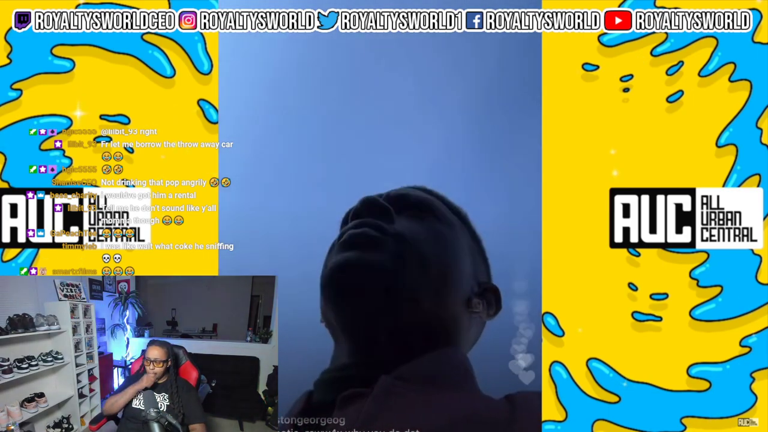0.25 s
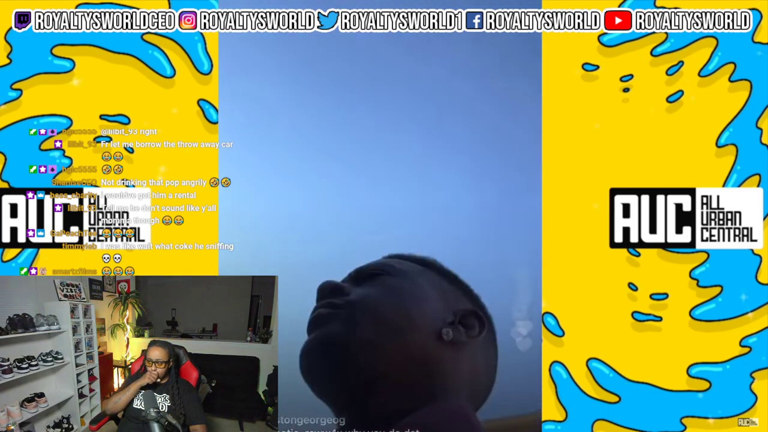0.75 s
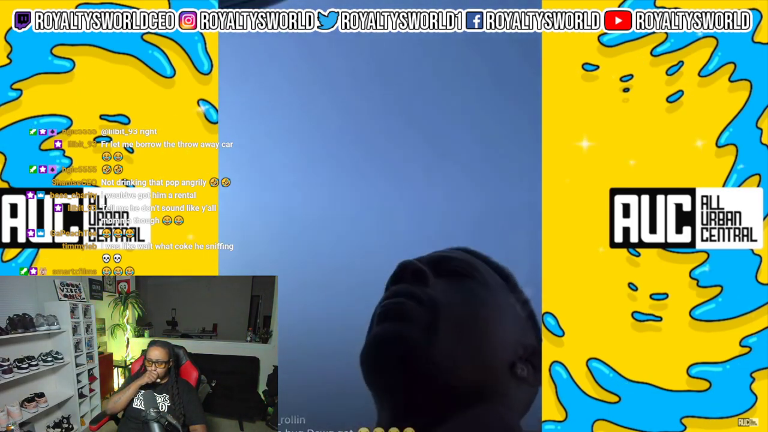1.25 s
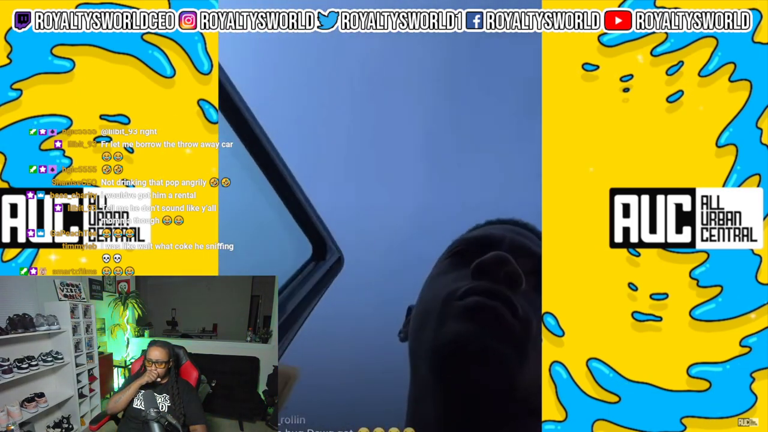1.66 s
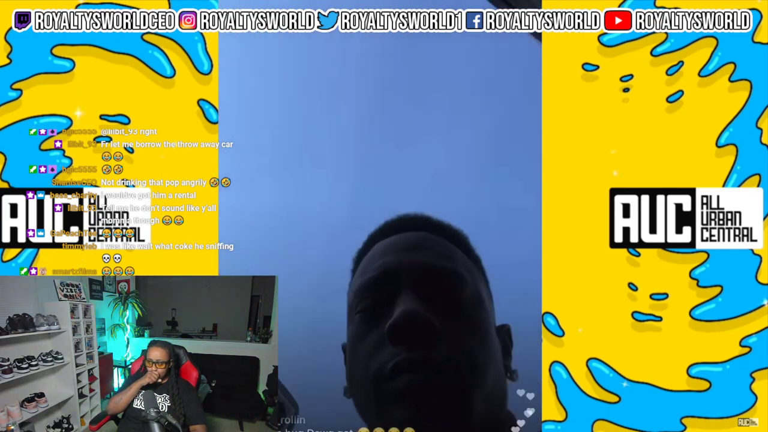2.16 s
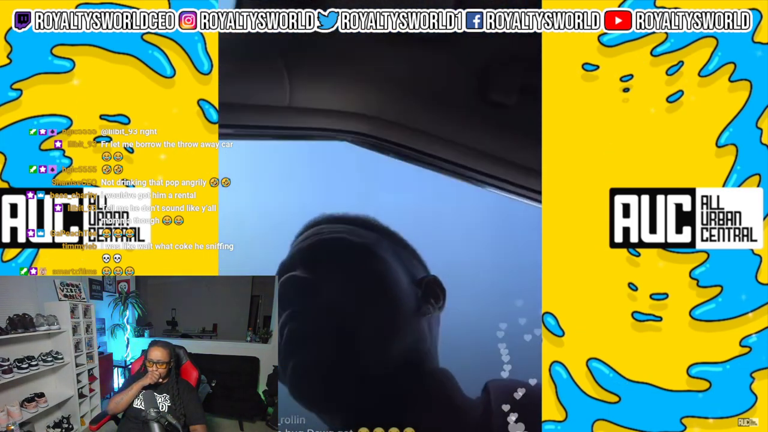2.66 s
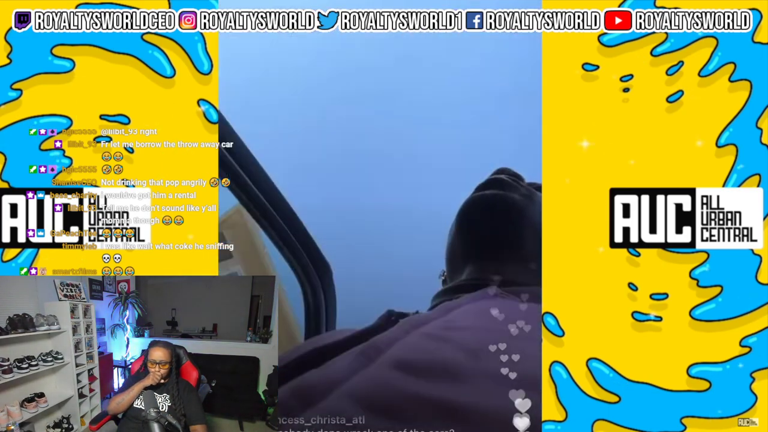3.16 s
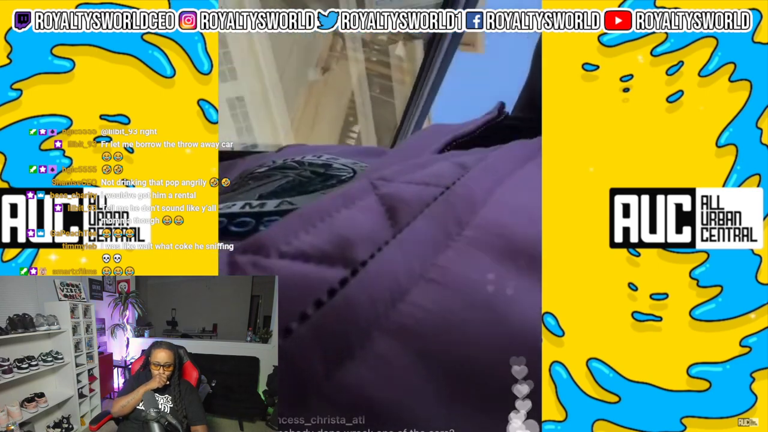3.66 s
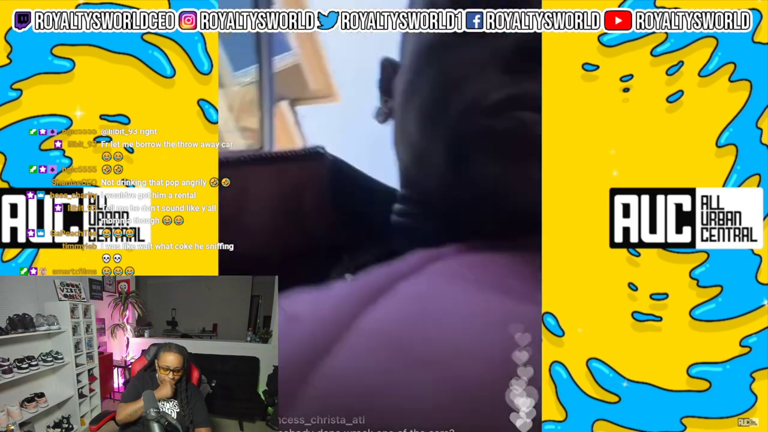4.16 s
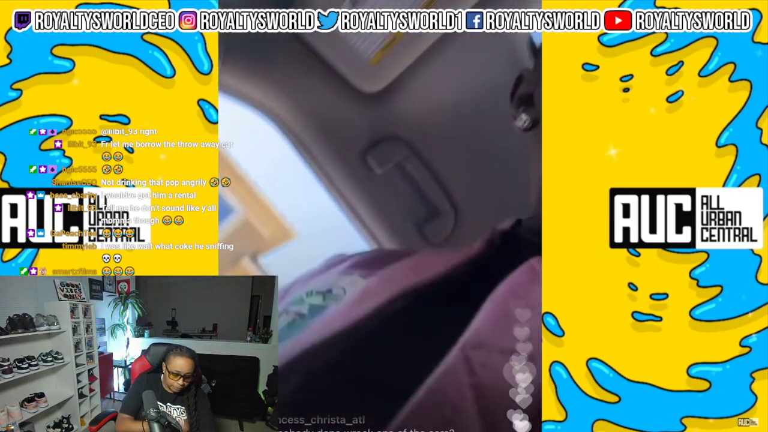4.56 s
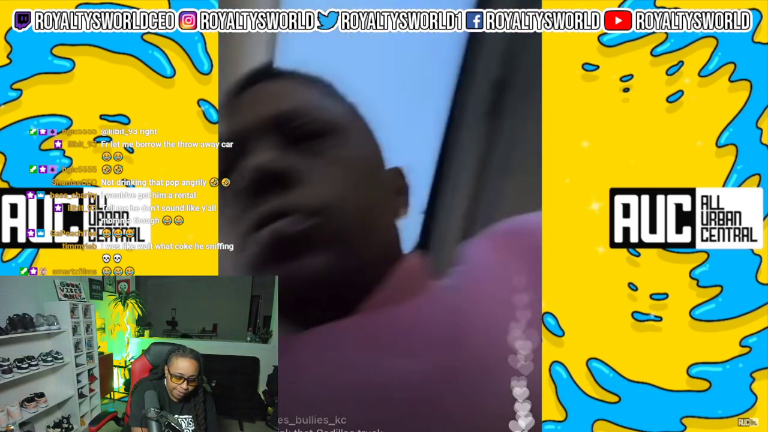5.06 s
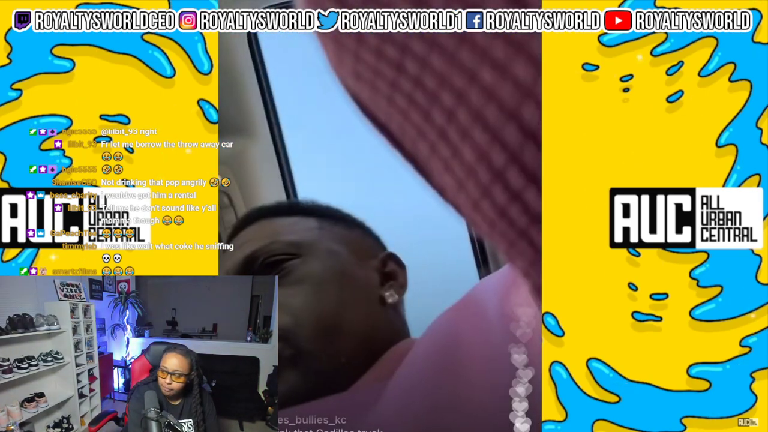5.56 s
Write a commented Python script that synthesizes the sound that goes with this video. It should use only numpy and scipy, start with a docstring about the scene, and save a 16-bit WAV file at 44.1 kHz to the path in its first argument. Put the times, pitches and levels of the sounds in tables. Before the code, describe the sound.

Handling bumps and a short rubbing groan, a ringing metal latch and door shudder, quilted cloth rustling, a deep body boom, and two final knocks.

```python
"""A car door opens and someone holding a phone slides in: a ringing latch, then a clunk and shudder.
Random rattles through shaped resonances make the latch, knocks and clicks; low swings make the
thumps and the boom of the car body under the weight. Coloured slip noise makes the fingers rubbing
the phone, the scuffs and the swish of a quilted jacket, over faint outdoor air noise.
Two last knocks end the move."""
import sys
import numpy as np
from scipy import signal
from scipy.fft import rfft, irfft
from scipy.io import wavfile
from scipy.ndimage import uniform_filter1d

SR = 44100
rng = np.random.default_rng(int(sys.argv[2]) if len(sys.argv) > 2 else 0)


def generate_wav(signal):
    """Clip the signal to [-1, 1] and save it as 16-bit WAV at the path in sys.argv[1]."""
    frames = np.transpose(np.atleast_2d(signal))
    scaled = np.clip(frames, -1, 1) * 32767
    pcm = np.round(scaled).astype(np.int16)
    wavfile.write(sys.argv[1], SR, pcm)


N = 256662
TIME = np.arange(N) / SR
EDGE_HZ = 15900  # upper edge of the phone's band


def amp(db):
    """Turns dB into a linear gain."""
    return 10 ** (np.asarray(db) / 20)


def unit(x):
    """Scales to rms 1."""
    return x / np.sqrt(np.mean(x ** 2) + 1e-20)


def read(points, hz):
    """Reads a frequency table on a log-frequency axis."""
    f, value = np.transpose(points)
    return np.interp(np.log(hz + 1), np.log(f + 1), value)


def level(rows, axis=1):
    """Gain over time from one dB column of a curve."""
    rows = np.array(rows)
    return amp(np.interp(TIME, rows[:, 0], rows[:, axis]))


def add(mix, s, sound):
    """Mixes a sound in at time s, in place."""
    part = mix[max(round(s * SR), 0):][:len(sound)]
    part += sound[:len(part)]


def colour(x, points):
    """Filters x by a dB curve, then scales it to rms 1."""
    gain = amp(read(points, np.fft.rfftfreq(len(x), 1 / SR)))
    return unit(irfft(rfft(x) * gain, len(x)))


def hump(hz, centre_hz, octaves, skirt_db):
    """One broad resonance, in dB."""
    distance = np.log2((hz + 1) / centre_hz) / octaves
    return -skirt_db * np.log1p(distance ** 2)


def waver(hz):
    """Random drift of rms 1, falling away above hz."""
    rolloff = 1 + (np.fft.rfftfreq(N, 1 / SR) / hz) ** 4
    return unit(irfft(rfft(rng.standard_normal(N)) / rolloff, N))


def friction(per_s, spread_db, smooth):
    """Tiny slips of uneven size over a smooth drag, rms 1."""
    happens = rng.random(N) < per_s / SR
    size = rng.standard_normal(N) * amp(spread_db * np.minimum(rng.exponential(1, N), 4))
    return unit(unit(happens * size) + smooth * rng.standard_normal(N))


def impulse(curve_db, lag_cycles=1.597, corner_hz=35, size=8192):
    """Causal tap response of energy 1; the highs come first and the bass lags, a quick downward chirp."""
    hz = np.fft.fftfreq(size, 1 / SR)
    log_gain = np.log(amp(np.maximum(curve_db(abs(hz)), -100)))
    minimum_phase = np.exp(np.conj(signal.hilbert(log_gain)))
    lag = 2 * np.pi * lag_cycles * np.sign(hz) * np.log1p(abs(hz) / corner_hz)
    h = np.fft.ifft(minimum_phase * np.exp(-1j * lag)).real[:size // 2]
    return h / np.linalg.norm(h)


def rattle(ring, size=16384):
    """Dense random echoes; each band falls 60 dB in ring(hz) seconds, 4 ms at least."""
    hz, t, z = signal.stft(rng.choice([-1., 1.], size), SR, nperseg=128)
    decay_db = -60 * t / np.maximum(ring(hz), .004)[:, None]
    return signal.istft(z * amp(decay_db), SR, nperseg=128)[1]


def blow(ring, chatter_db):
    """A clean tap followed by random chatter, energy 1."""
    drive = rattle(ring)
    drive *= amp(chatter_db) / np.linalg.norm(drive)
    drive[0] += 1
    return drive / np.linalg.norm(drive)


def ringing(modes, size=16384):
    """Free vibration of a struck part: decaying sines, peak 1."""
    t = np.arange(size) / SR
    x = sum(amp(db - 60 * t / t60) * np.sin(2 * np.pi * hz * t) for hz, db, t60 in modes)
    return x / abs(x).max()


# open air around the car: (time [s], wash level [dB], hiss level [dB]), before the layer gains
AIR_LEVEL = [(0.0, -59, -62), (0.32, -57, -70), (0.69, -62, -63.5), (1.08, -61, -68), (1.35, -54, -63.5),
             (1.78, -55.5, -66.5), (2.0, -65.5, -73), (2.41, -68, -64.5), (3.1, -59.5, -63)]
# spectrum of the low wash: (frequency [Hz], level [dB])
WASH_COLOUR = [(20, -1), (45, -0.5), (92, -8), (280, -17), (520, -20), (1000, -20.5), (1600, -25.5),
               (2400, -26), (5000, -34.5), (9000, -77)]
# spectrum of the thin hiss: (frequency [Hz], level [dB])
HISS_COLOUR = [(1200, -7), (2000, -10), (3200, -6), (7800, -5), (10500, -15.5), (16000, -12)]


def air(wash_db=5, hiss_db=1, drift_db=2):
    """Faint outdoor noise: a low wash that drifts in level, with a thin hiss on top."""
    wash = colour(rng.standard_normal(N), WASH_COLOUR) * level(AIR_LEVEL, axis=1)
    wash *= amp(wash_db + drift_db * waver(hz=9.3))
    hiss = colour(rng.standard_normal(N), HISS_COLOUR) * level(AIR_LEVEL, axis=2)
    return wash + hiss * amp(hiss_db)


# scuffs of sleeve, shoe and seat, level before the swell:
# (time [s], level [dB], length [s], centre [Hz], width [octaves])
SCUFFS = [(0.15, -58, 0.22, 4930, 1.7), (0.269, -38.5, 0.17, 1940, 1.5), (0.718, -55, 0.071, 3400, 1.8),
          (0.741, -45.5, 0.05, 330, 0.51), (0.811, -50, 0.23, 220, 1.46), (1.101, -53.5, 0.14, 6000, 5.4),
          (1.934, -44, 0.062, 840, 2.37), (2.32, -67, 0.3, 13000, 1), (5.01, -53.5, 0.43, 1340, 0.43),
          (5.368, -45, 0.24, 1510, 0.98)]


def scuffs(skirt_db=16.0, top_hz=9500):
    """Brief swells of cloth friction, each in its own broad resonance."""
    out, drag = np.zeros(N), friction(per_s=2000, spread_db=2.5, smooth=.8)
    hz = np.geomspace(20, EDGE_HZ, 80)
    dull_top = 10 / (1 + (top_hz / hz) ** 20)  # takes up to 10 dB off above top_hz
    for s, db, length, centre_hz, octaves in SCUFFS:
        stroke = drag[round(s * SR):][:round(length * SR)]
        shape = hump(hz, centre_hz, octaves, skirt_db) - dull_top
        swell = np.sqrt(np.hanning(len(stroke)))
        add(out, s, amp(db) * colour(stroke, np.column_stack([hz, shape])) * swell)
    return out


SAG_DB_PER_S, STOP_DB_PER_S = 29, 213  # a stroke slows while it lasts, then falls faster still


def stroke_gain(s, rise, length):
    """One slide of cloth: it gathers speed, sags and stops."""
    t = np.maximum(TIME - s, 0)
    speed = np.sin(np.pi / 2 * np.minimum(t / rise, 1))
    sag_db = SAG_DB_PER_S * np.maximum(t - rise, 0)
    stop_db = STOP_DB_PER_S * np.maximum(t - length, 0)
    return speed * amp(-sag_db - stop_db)


# strokes of the jacket, one per shift of the body, levels before the layer gains:
# (time [s], rise of the shell [s], length [s], swish level [dB], padding level [dB])
JACKET = [(2.813, 0.032, 0.3, -56, -69), (3.163, .055, 0.078, -42.5, -43.5), (3.24, 0.037, 0.14, -55, -47),
          (3.389, 0.16, 0.21, -46.5, -41), (3.58, 0.25, 0.76, -50.5, -52),
          (3.917, 0.12, 0.16, -34.5, -32.5), (4.067, .04, 0.34, -39.5, -34),
          (4.224, 0.052, 0.18, -36, -43.5), (5.38, 0.019, 0.11, -43, -68)]
# the back sliding down into the seat: (time [s], swish level [dB], padding level [dB]), before the gains
SETTLING = [(4.45, -58, -46), (4.84, -60.5, -47.5), (4.91, -52, -41), (5.15, -53.5, -45.5),
            (5.35, -49, -43), (5.57, -51, -47), (5.66, -75, -55.5), (5.82, -76, -52)]
# spectrum of the woven shell: (frequency [Hz], level [dB])
SWISH_COLOUR = [(500, -1), (900, -2), (1800, -5.5), (2800, -5), (4500, -6.5), (7000, -6), (8500, -7.5),
                (10500, -20), (15500, -16.5)]
# spectrum of the rubbing padding: (frequency [Hz], level [dB])
PADDING_COLOUR = [(25, -30), (60, 3.5), (110, 3), (230, 1.5), (400, -2), (600, -5), (1200, -12.5),
                  (2500, -23.5), (5000, -33)]
PADDING_RISE_SHARE = 0.38  # the padding catches sooner than the shell gets up to speed


def jacket(swish_db=0, padding_db=-2.5, flutter_db=0.33, lumps_db=1, fade_s=0.062):
    """The woven shell hisses as it slides; the padding under it rubs in soft, uneven lumps."""
    flutter = waver(hz=45)
    weave = friction(per_s=2500, spread_db=2.2, smooth=1.8)
    lumps = friction(per_s=600, spread_db=1.8, smooth=1.2)
    # the settling fades in just ahead of its first point
    seated = np.clip((TIME - SETTLING[0][0]) / fade_s + 1, 0, 1)
    slide = seated * level(SETTLING, axis=1)
    press = seated * level(SETTLING, axis=2)
    for s, rise, length, slide_db, press_db in JACKET:
        slide = np.hypot(slide, amp(slide_db) * stroke_gain(s, rise, length))
        press = np.hypot(press, amp(press_db) * stroke_gain(s, rise * PADDING_RISE_SHARE, length))
    swish = colour(weave, SWISH_COLOUR) * slide * amp(swish_db + flutter_db * flutter)
    padding = colour(lumps, PADDING_COLOUR) * press * amp(padding_db + lumps_db * flutter)
    return swish + padding


# fingers dragging over the phone case, level before the layer gain:
# (time of firmest pressure [s], level [dB], easing off [dB/s])
GRIPS = [(0.328, -22.5, 177), (0.766, -42, 448), (1.166, -28.5, 96)]
# spectrum of skin on the case: (frequency [Hz], level [dB])
GRIP_COLOUR = [(25, -10), (60, 4), (400, 4), (950, -5.5), (1200, -10), (1900, -15), (3600, -19),
               (5600, -31.5), (8000, -26.5), (13000, -79)]
GRIP_RISE_DB_PER_S = 345


def grip(gain_db=-3):
    """Skin sticks and slips on the case as the finger pressure rises and eases."""
    rub = colour(friction(per_s=830, spread_db=-5, smooth=0.99), GRIP_COLOUR)
    pressure = np.zeros(N)
    for s, db, easing in GRIPS:
        drop_db = np.maximum(GRIP_RISE_DB_PER_S * (s - TIME), easing * (TIME - s))
        pressure += amp(db - drop_db)
    return amp(gain_db) * pressure * rub


def patchy(x, patch_db=2.4, span_s=0.033, span_hz=260):
    """Random patches of gain over time and frequency make the colour of the rubbing shift unevenly."""
    hz, t, z = signal.stft(x, SR, nperseg=512, noverlap=384)
    # random gains smoothed over time, then over frequency
    patches = uniform_filter1d(rng.standard_normal(z.shape), max(round(span_s / t[1]), 1), axis=1)
    patches = unit(uniform_filter1d(patches, max(round(span_hz / hz[1]), 1), axis=0))
    shifted = signal.istft(z * amp(patch_db * patches), SR, nperseg=512, noverlap=384)[1][:N]
    return unit(shifted) * np.std(x)


# a fingertip judders on the case, loudest in mid-slip, with its rate rising through the slip
JUDDER_S, JUDDER_DB, JUDDER_SWELL_S = 0.370, -19, 0.013
JUDDER_HZ, JUDDER_RISE_HZ_PER_S = 330, 3500  # rate in mid-slip and its climb


def judder(jitter=0.07, overtone_db=-13):
    """Stick and slip fall briefly into step: a rough, rising groan of skin on plastic."""
    t = TIME - JUDDER_S
    rate = np.clip(JUDDER_HZ + JUDDER_RISE_HZ_PER_S * t, JUDDER_HZ / 2, JUDDER_HZ * 2)
    turns = np.cumsum(rate * (1 + jitter * waver(hz=150))) / SR
    # overtone_db is the slope per octave
    groan = sum(amp(overtone_db * np.log2(k)) * np.sin(2 * np.pi * k * turns) for k in range(1, 5))
    return unit(groan) * amp(JUDDER_DB) * np.exp(-abs(t) / JUDDER_SWELL_S)


# knocks on the phone case and door trim, level before the layer gain:
# (time [s], level [dB], bass tilt [dB], treble tilt [dB])
KNOCKS = [(0.014, -43, -17, -19), (0.320, -8.5, -4.5, -11), (0.342, -19, -9, -3), (0.352, -16.5, -30, -6),
          (0.364, -19, -8, 5), (0.376, -18.5, -24, -3), (0.454, -21.5, 5.5, 3.5), (1.127, -31, -8, -10),
          (1.150, -17, 0.5, -19), (1.165, -15.5, -18, -7), (1.185, -19, -13, -21), (1.247, -26, 1, 9),
          (1.605, -27, -32, 11), (2.580, -34.5, 5, 12), (2.608, -30, 8.5, 10), (2.855, -40, -11, 9),
          (3.169, -36, 13, 11), (3.381, -37, -7, 15), (3.843, -33.5, 2, -2), (3.929, -28.5, -11, -10),
          (4.242, -22, -8, -10), (4.426, -26.5, -10.5, -3), (4.494, -39, -14, 6), (5.393, -20.5, 6.5, 14),
          (5.588, -14, 14.5, 13.5)]
# resonances of the case: (frequency [Hz], level [dB])
CASE_COLOUR = [(40, -4), (70, 2.5), (175, 1.5), (340, -1.5), (520, -4.5), (900, -5.5), (1180, -15),
               (1480, -14), (2400, -26), (3700, -29), (5000, -47), (8200, -39), (15000, -79)]
KNOCK_RING_S = 0.11  # scaled by 1.5 in the bass, towards 0.5 in the treble


def knocks(chatter_db=2.5, knee_hz=1200, bass_hz=220, treble_hz=1600, gain_db=19):
    """Each knock is a tap and a short shudder of the case; the treble dies first."""
    out = np.zeros(N)
    for s, db, bass_db, treble_db in KNOCKS:
        def tone(hz):
            bass = bass_db / (1 + (hz / bass_hz) ** 2)
            treble = treble_db * hz ** 2 / (hz ** 2 + treble_hz ** 2)
            return read(CASE_COLOUR, hz) + bass + treble
        drive = blow(lambda hz: KNOCK_RING_S * (.5 + 1 / (1 + hz / knee_hz)), chatter_db)
        add(out, s, amp(db + gain_db) * signal.fftconvolve(drive, impulse(tone)))
    return out


# sharp clicks of handle, zip and trim, level before the layer gain:
# (time [s], level [dB], centre [Hz], width [octaves], ring [s])
CLICKS = [(0.828, -34, 1490, 0.42, 0.025), (0.8783, -41.5, 5460, 0.97, 0.0072),
          (1.102, -37, 3000, 0.5, 0.031), (1.169, -21.5, 3270, 0.41, 0.018),
          (1.277, -46, 12000, 0.87, 0.054), (1.692, -23.5, 4330, 0.67, 0.035),
          (1.878, -37.5, 4950, 0.72, 0.036), (2.298, -40.5, 10700, 0.89, 0.081),
          (3.312, -28, 6800, 0.32, 0.022), (4.418, -23, 2690, 0.75, 0.0064),
          (4.427, -17.5, 1950, 0.98, 0.0086), (5.112, -36.5, 2400, 0.72, 0.04),
          (5.3942, -16.5, 1530, 0.54, 0.062), (5.588, -23.5, 2000, 1.6, 0.073),
          (5.635, -37, 2000, 1.4, 0.042)]


def clicks(skirt_db=7.0, gain_db=13):
    """Hard little parts snap in one broad resonance, with a brief chatter behind."""
    out = np.zeros(N)
    for s, db, centre_hz, octaves, ring in CLICKS:
        drive = blow(lambda hz: np.full_like(hz, ring), chatter_db=-1)
        body = impulse(lambda hz: hump(hz, centre_hz, octaves, skirt_db))
        add(out, s, amp(db + gain_db) * signal.fftconvolve(drive, body))
    return out


# dull thumps of hand, door and sprung car body, level before the layer gain:
# (time [s], level [dB], pitch [Hz])
THUMPS = [(0.332, -29, 130), (0.465, -41, 75.5), (0.906, -35, 68), (1.215, -28, 74), (1.736, -27, 77),
          (2.615, -38.5, 157), (2.666, -40, 67), (2.723, -39, 64), (3.269, -34, 87), (4.264, -32, 90),
          (4.448, -32.5, 75), (4.585, -28.5, 65), (4.587, -15.5, 27.6), (4.68, -19, 20.1), (4.905, -23, 27),
          (5.284, -28, 162), (5.363, -28.5, 112), (5.405, -27, 62), (5.596, -16, 126), (5.599, -17, 79)]
THUMP_CYCLES = 17.3  # every thump falls 60 dB in this many swings


def thumps(rise_cycles=0.5, gain_db=3):
    """Soft, heavy pushes: a low swing that builds within a cycle and dies away."""
    out, t = np.zeros(N), np.arange(SR) / SR
    for s, db, hz in THUMPS:
        swing = np.sin(2 * np.pi * hz * t) * np.exp(-np.log(1000) * t * hz / THUMP_CYCLES)
        build = 1 - np.exp(-(t * hz / rise_cycles) ** 2)
        add(out, s, amp(db + gain_db) * swing * build)
    return out


# the latch lets go and its pawl bounces: (time [s], level before the latch gain [dB], ring [s])
LATCH = [(1.585, -10.5, 0.026), (1.598, -19.5, 0.062), (1.635, -35.5, 0.13), (1.6627, -27, 0.11)]
# spectrum of the latch steel: (frequency [Hz], level [dB])
LATCH_COLOUR = [(300, -24), (900, -15), (1250, -4.5), (1600, 2), (2200, -10.5), (2980, 2), (3380, 0),
                (3850, -12), (4400, -4), (4850, -28), (5400, -12), (6500, -19.5), (10000, -26.5),
                (15000, -31)]
# the door coming off its seal: (time [s], level before the panel and shudder gains [dB])
DOOR = [(1.692, -17.5)]
# spectrum of the shudder: (frequency [Hz], level [dB])
DOOR_COLOUR = [(40, -16), (90, -11), (180, -3.5), (260, -13), (400, -8.5), (640, -14), (860, -6),
               (1300, -26.5), (1600, -14.5), (2300, -24.5), (3200, -25.5), (15000, -36)]
# decay of the shudder: (frequency [Hz], time to fall 60 dB [s])
DOOR_RING = [(80, 0.52), (300, 0.31), (900, 0.17), (2000, 0.1), (5000, 0.088), (12000, 0.065)]
# ringing modes of the panel: (frequency [Hz], relative level [dB], time to fall 60 dB [s])
DOOR_MODES = [(163, -34, .2), (196, -1, 0.28), (400, -20, 0.33), (892, 2, 0.039), (1120, -15, 0.21)]


def door(latch_db=13, panel_db=-2, shudder_db=-4):
    """The latch clacks as it lets go; then the panel clunks and shudders."""
    out, steel = np.zeros(N), impulse(lambda hz: read(LATCH_COLOUR, hz))
    for s, db, ring in LATCH:
        # a longer rattle holds more of the energy
        looseness_db = 10 * np.log10(ring / .05)
        drive = blow(lambda hz: np.full_like(hz, ring), looseness_db)
        add(out, s, amp(db + latch_db) * signal.fftconvolve(drive, steel))
    for s, db in DOOR:
        echoes = rattle(lambda hz: read(DOOR_RING, hz))
        shudder = signal.fftconvolve(echoes, impulse(lambda hz: read(DOOR_COLOUR, hz)))
        # a flat spectrum here: only the downward chirp
        clunk = signal.fftconvolve(ringing(DOOR_MODES), impulse(np.zeros_like))
        add(out, s, amp(db + shudder_db) * shudder)
        add(out, s, amp(db + panel_db) * clunk)
    return out


def scene():
    """One microphone, the same in both ears."""
    blows = knocks() + clicks() + thumps() + door()
    rubbing = patchy(grip() + scuffs() + jacket()) + judder()
    mono = blows + rubbing + air()
    return np.array([mono, mono])


def record(dry):
    """The band limit of the phone: a steep low-pass."""
    lowpass = signal.firwin(511, EDGE_HZ, window=("kaiser", 9), fs=SR)
    return signal.oaconvolve(dry, lowpass[None], "same")


dry = scene()
out = record(dry)
generate_wav(out)
```